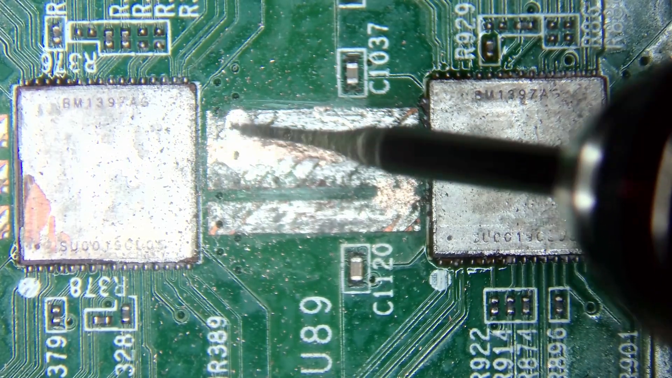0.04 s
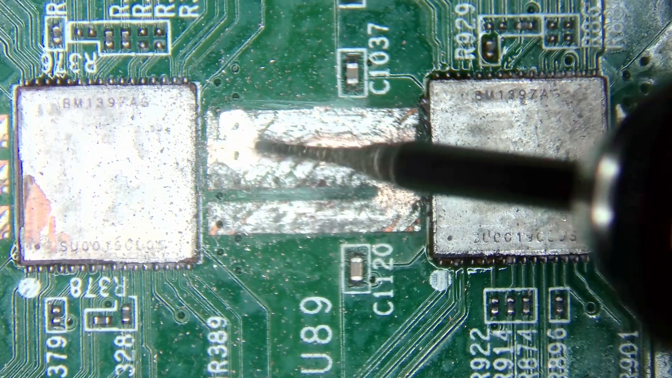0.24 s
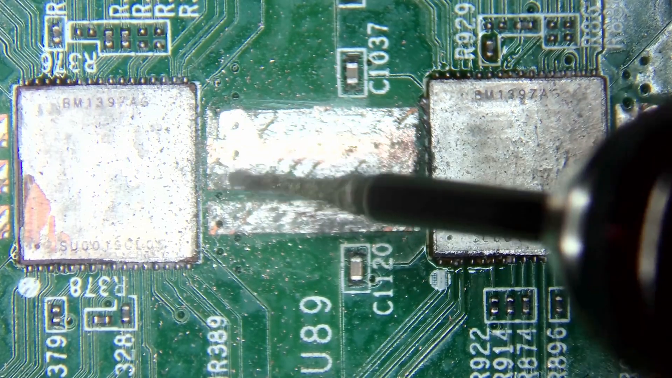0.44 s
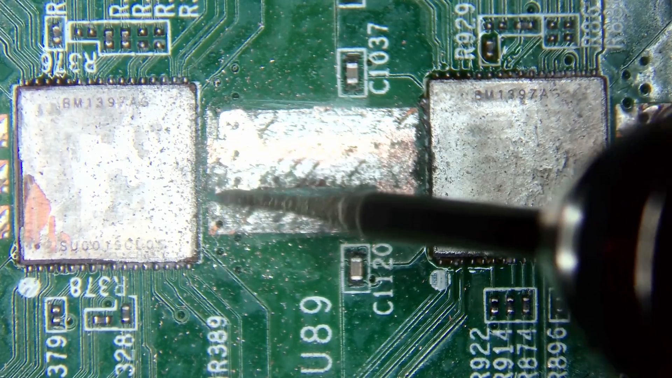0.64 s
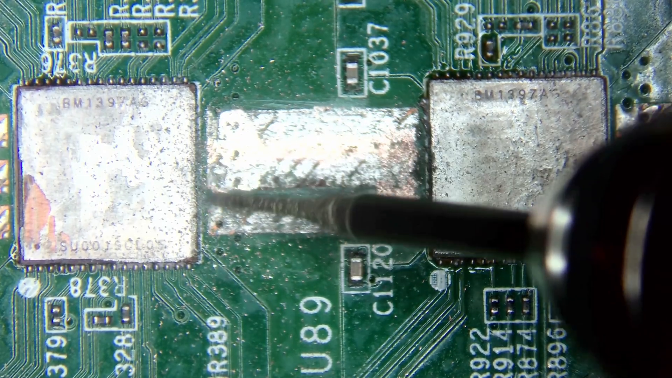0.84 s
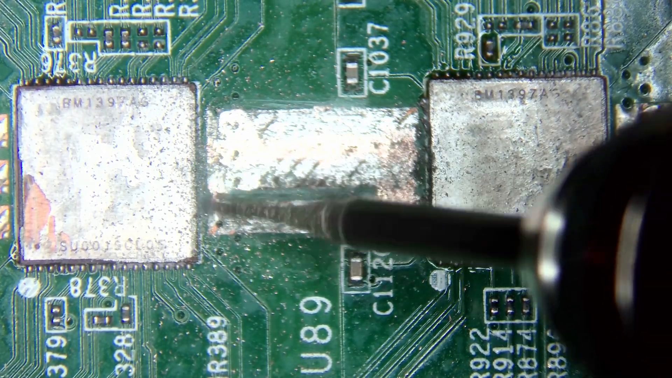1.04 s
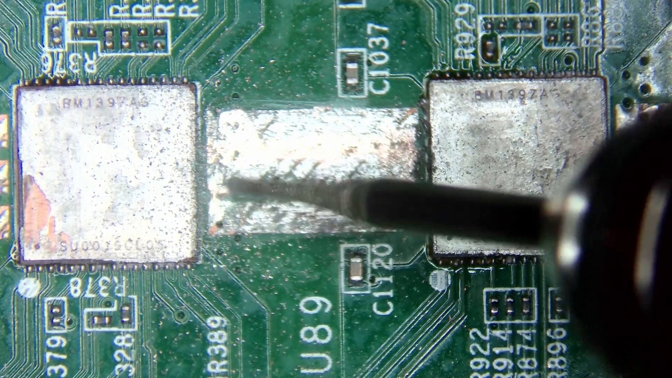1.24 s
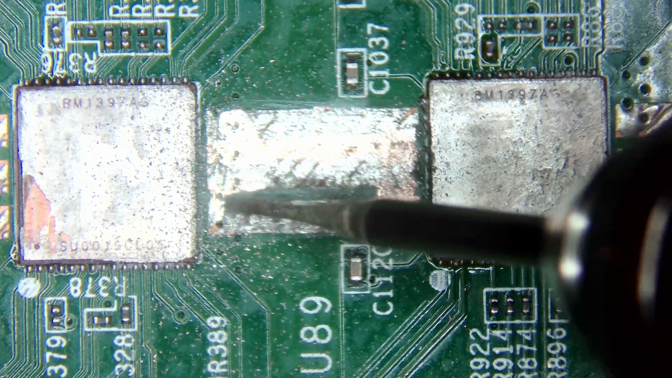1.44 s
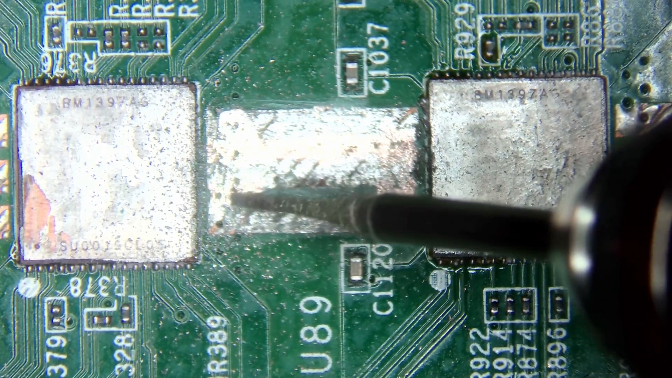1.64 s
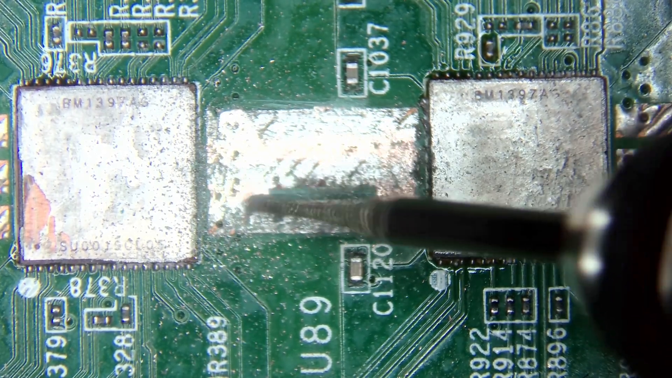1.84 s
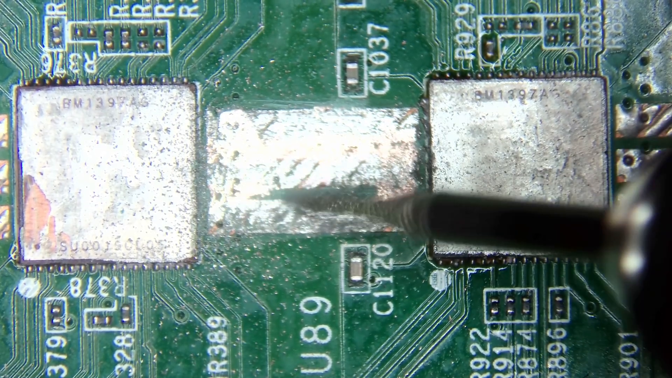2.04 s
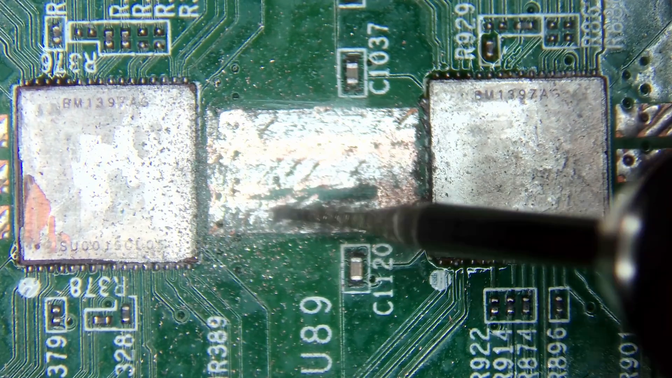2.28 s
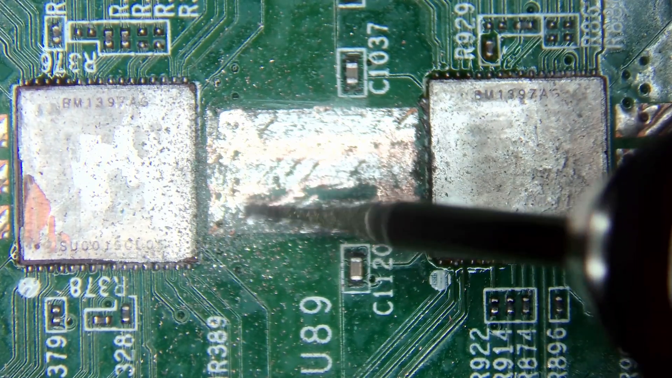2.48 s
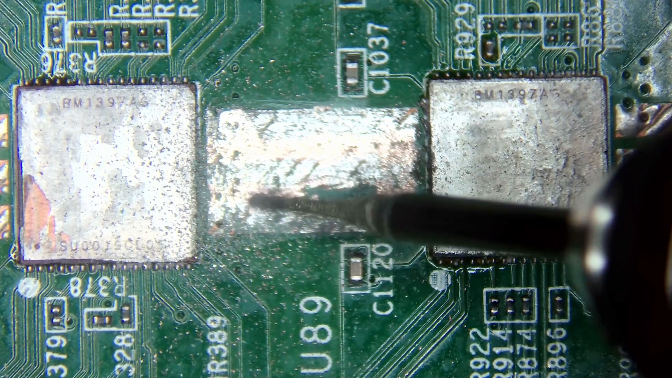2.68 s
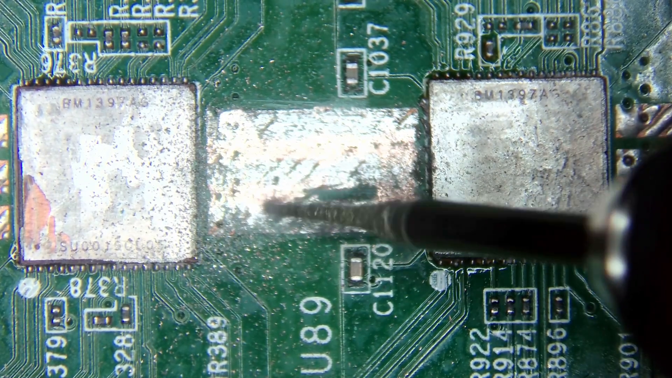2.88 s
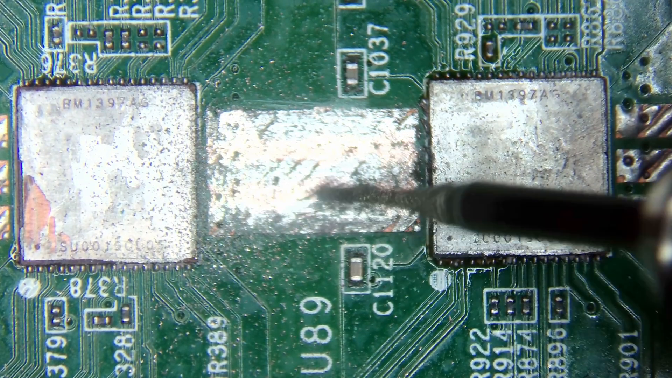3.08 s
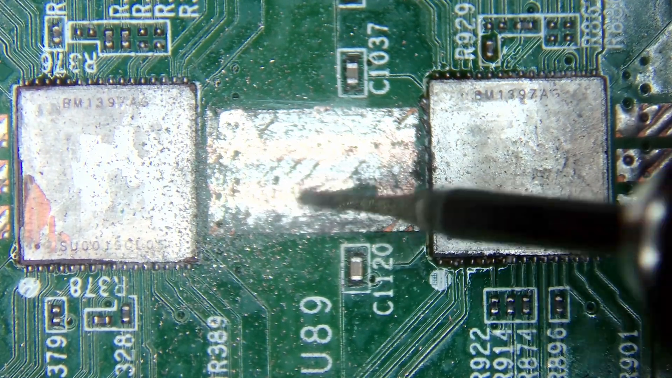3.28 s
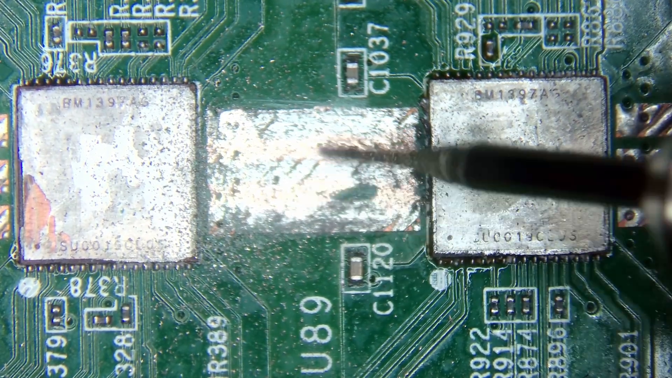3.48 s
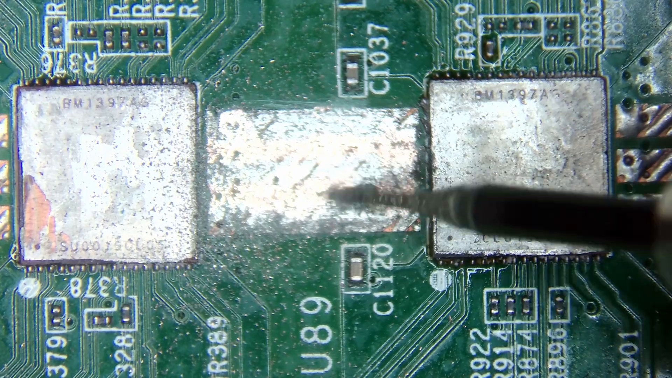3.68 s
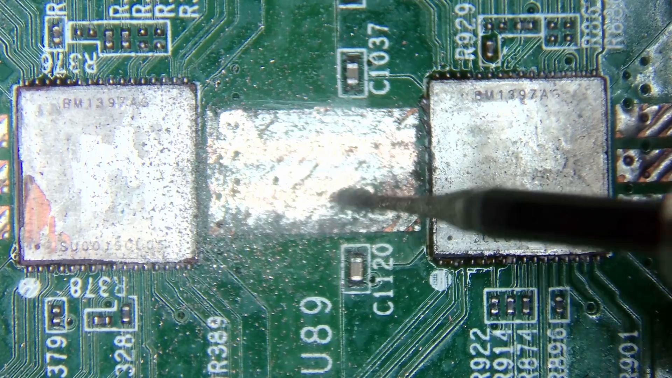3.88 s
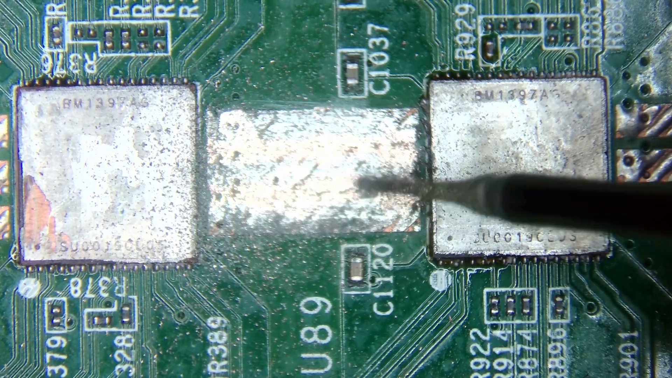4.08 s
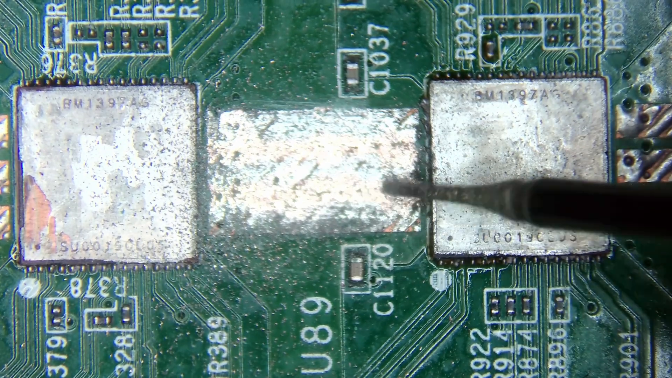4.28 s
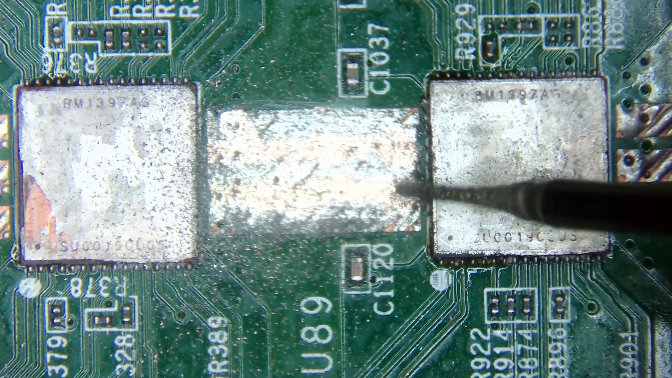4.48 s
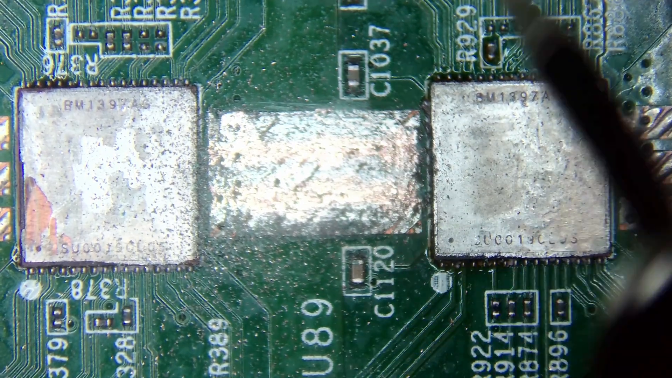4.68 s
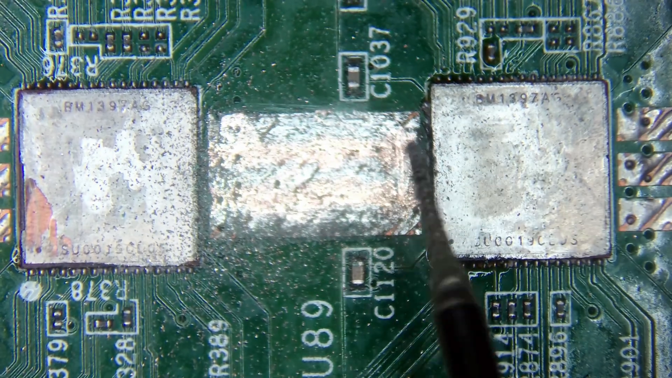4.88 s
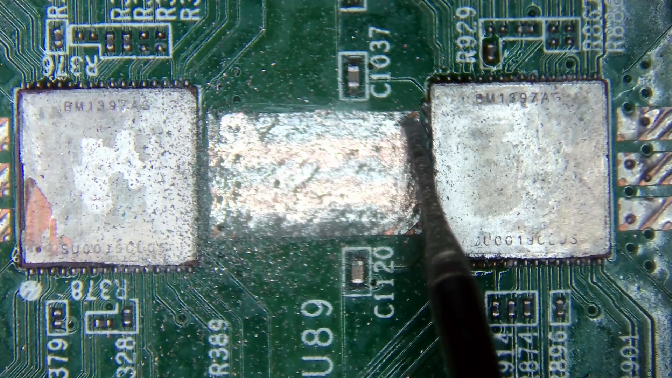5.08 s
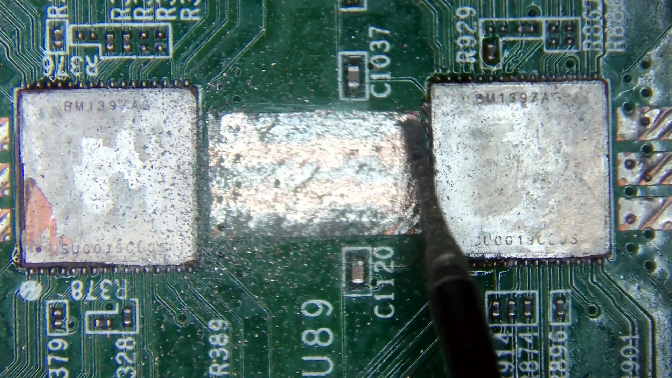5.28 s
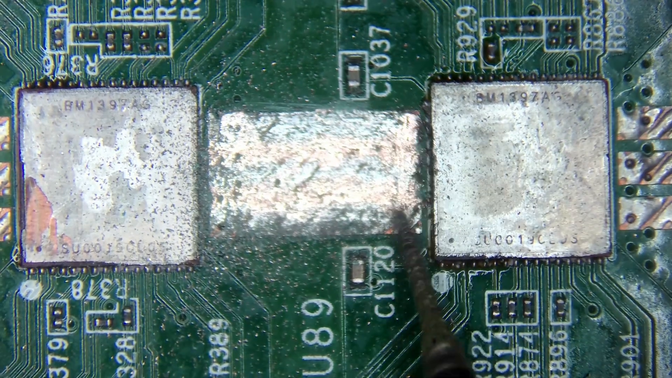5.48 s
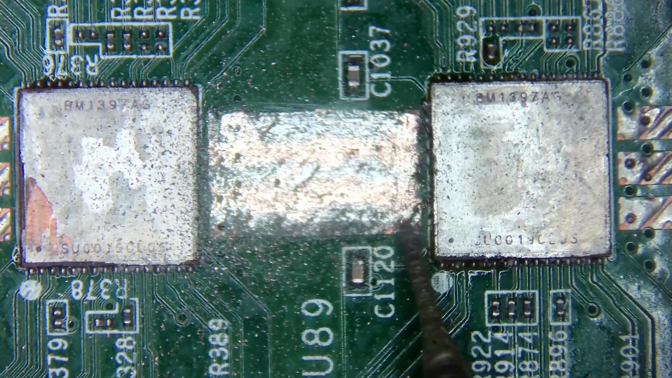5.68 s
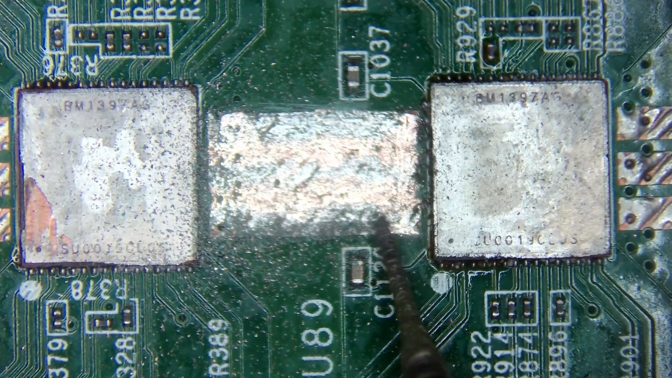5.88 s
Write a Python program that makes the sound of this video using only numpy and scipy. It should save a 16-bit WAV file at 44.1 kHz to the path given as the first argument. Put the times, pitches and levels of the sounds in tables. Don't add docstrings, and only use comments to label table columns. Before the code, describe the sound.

A pen-sized rotary grinder works on a circuit board very close to a small microphone. A rough, nasal buzz with hissing grit flutters rapidly as the burr skids and grips, almost unbroken for over four and a half seconds. It lifts, leaving a quieter thin motor whine for about half a second, then cuts again in shorter, brighter spurts. Low workshop rumble sits faintly underneath; the sound is dry.

```python
import sys
import numpy as np
from scipy import signal
from scipy.fft import rfft, irfft
from scipy.io import wavfile
from scipy.ndimage import uniform_filter1d

SR = 44100
rng = np.random.default_rng(int(sys.argv[2]) if len(sys.argv) > 2 else 0)


def int16_out(signal):
    q = np.round(np.clip(np.atleast_2d(signal).T, -1, 1) * 32767)
    wavfile.write(sys.argv[1], SR, q.astype(np.int16))


def nominal_scale(level):
    x = np.asarray(level, float) / 20
    return 10 ** x


N = 261513
T = np.arange(N) / SR
FREE_HZ = 219.6
SWING_S = 4.79


def level(x, db):
    return x * nominal_scale(db) / np.sqrt(np.mean(x ** 2))


def curve(rows):
    s, *columns = np.transpose(rows)
    return [np.interp(T, s, c) for c in columns]


def during(rows):
    return sum(value * ((T >= start) & (T < end)) for start, end, value in rows)


def bumps(rows, skew=0.):
    out = np.zeros(N)
    for s, height, half_ms in rows:
        near = slice(max(int((s - .15) * SR), 0), int((s + .15) * SR))
        x = 1000 * (T[near] - s) / half_ms - skew
        side = np.where(x < 0, 1 + skew, 1 - skew)
        out[near] += height * np.exp(-(x / side) ** 2)
    return out


def walk(rate):
    k = int(SR / rate)
    held = np.repeat(rng.standard_normal(N // k + 1), k)
    return uniform_filter1d(held, k)[:N]


def lag(x, tau_s):
    keep = np.exp(-1 / (tau_s * SR))
    return signal.lfilter([1 - keep], [1, -keep], x)


def clicks(at, size):
    at = np.clip(at, 0, N - 2)
    i = at.astype(int)
    return np.bincount(i, size * (1 - at + i), N) + np.bincount(i + 1, size * (at - i), N)


def colour(x, points, sudden=0.97, size=4096):
    hz, db = np.transpose(points)
    f = np.maximum(np.fft.rfftfreq(size, 1 / SR), 1)
    log_gain = np.interp(np.log(f), np.log(hz), db) * np.log(10) / 20
    cep = irfft(log_gain)
    cep[1:size // 2] *= 2
    cep[size // 2 + 1:] = 0
    phase = sudden * rfft(cep).imag
    response = np.roll(irfft(np.exp(log_gain + 1j * phase)), size // 2)
    return level(signal.fftconvolve(x, response)[size // 2:size // 2 + N], 0)


def shop():
    # f/Hz, level/dB [per Hz]
    rumble = [(12, -74), (20, -4.5), (117, -3), (270, -7.5), (306, -12.5), (409, -8.5), (447, -12.5),
              (597, -12), (702, -13), (1500, -12.5), (1950, -108), (3300, -120)]
    return level(nominal_scale(1.3 * walk(2.28)) * colour(rng.standard_normal(N), rumble), -55)


def bench(x, t60_s=.08):
    t = T[:int(.2 * SR)]
    echoes = rng.standard_normal(len(t)) * np.exp(-np.log(1000) * t / t60_s)
    return signal.fftconvolve(x, echoes)[:N]


def shaft():
    # touch t/s, lift t/s
    contacts = [
        (0, .257),
        (.283, 1.92),
        (1.947, 4.601),
        (5.07, 5.381),
        (5.533, 5.596),
        (5.612, 5.94),
    ]
    contact_grit = [-41, -41, -41.5, -43.5, -45, -44.5]
    # t/s, level/dB
    press = [(0, -39.5), (.26, -48.5), (.3, -43), (.6, -40), (.95, -46), (1.3, -41.5), (1.65, -39.5),
             (1.93, -41.5), (2.4, -42), (2.9, -40.5), (3.3, -39), (3.8, -40.5), (4.6, -40), (5.07, -43),
             (5.38, -45), (5.58, -55), (5.7, -44), (5.93, -41.5)]
    # t/s, f/Hz
    speed_first = [(0, 202), (.17, 200), (.24, 212), (.38, 194), (.44, 199), (.62, 195), (1.0, 205),
                   (1.28, 197), (1.9, 196)]
    # t/s, f/Hz
    speed_second = [(1.96, 199), (2.33, 201.7), (2.8, 200), (3.13, 193.4), (3.53, 189.4), (3.68, 196.5),
                    (3.79, 191.7), (4.0, 193), (4.3, 202.9), (4.6, 194.1)]
    # t/s, f/Hz
    speed_across = [(5.07, 215.8), (5.18, 202.1), (5.38, 201.9), (5.54, 215.7), (5.66, 214.6), (5.8, 197.1),
                    (5.93, 199.8)]
    # t/s, loss/dB, half length/ms
    skids = [(0.04, 3.0, 11), (0.07, 5.5, 12.8), (0.114, 6.5, 10), (0.145, 6.5, 5.9),
             (0.209, 7, 10.8), (0.332, 7, 5.2), (0.399, 7.1, 9.3), (0.453, 9.5, 20.2),
             (0.531, 8, 19.7), (0.582, 5.5, 11), (0.605, 10.5, 6.7), (0.677, 10.0, 24.3),
             (0.741, 9.5, 15.4), (0.811, 5.5, 33.4), (0.893, 5.0, 13), (0.98, 5, 14.4),
             (1.043, 7.5, 18.5), (1.119, 9.0, 19), (1.18, 9, 15.3), (1.268, 10, 10), (1.328, 8, 12),
             (1.394, 7.5, 11), (1.455, 10.5, 20.8), (1.516, 5, 13), (1.586, 5.5, 18.4),
             (1.654, 7, 22), (1.703, 10, 20.8), (1.775, 6.5, 17.3), (1.818, 4.0, 6.2),
             (1.863, 7.5, 15.6),
             (1.983, 6.5, 39.6), (2.059, 8.5, 14), (2.142, 6, 14), (2.209, 6.5, 4.8), (2.47, 6, 9),
                    (2.534, 5.5, 24.8), (2.604, 6.5, 12.5), (2.672, 4.5, 25), (2.786, 4, 23.7),
                    (2.816, 7.5, 9), (2.88, 7.5, 17.8), (3.019, 10.5, 7), (3.059, 4.5, 11.1),
                    (3.21, 2.5, 30), (3.285, 2, 12.7), (3.389, 2, 25), (3.424, 6.5, 8.1),
                    (3.565, 3.5, 14.43), (3.682, 9.5, 8.5), (3.739, 8, 11.6), (3.86, 4.5, 5.91),
                    (3.886, 4.5, 9.8), (4.048, 3, 10), (4.108, 3, 12.5), (4.168, 6, 9.9), (4.236, 7, 10.8),
                    (4.291, 3, 28.5), (4.405, 7.5, 7.9), (4.445, 7, 22), (4.525, 10.5, 17.9),
             (4.583, 9.5, 13), (5.078, 3.5, 12.1), (5.133, 6.5, 10.6), (5.197, 6, 26),
                    (5.253, 4.5, 14), (5.312, 3.5, 7.86), (5.34, 10, 7.1), (5.628, 7.5, 23),
                    (5.672, 10, 16), (5.738, 6, 15.3), (5.775, 8, 15.2), (5.844, 3.5, 12.2),
                    (5.873, 10, 13.55), (5.932, 3, 11)]
    # t/s, extra grit level/dB
    edges = [(0.293, 3), (1.128, -4), (1.424, 6), (2.5, 2.5), (3.76, -3), (4.43, 5.5), (5.101, 5.5),
             (5.28, 1.5), (5.712, 5.5), (5.812, 7), (5.91, 9)]
    inertia_s, edge_ms, regrip_ms = .028, 6.6, 2

    grit_db = during([(*contact, db) for contact, db in zip(contacts, contact_grit)])
    cutting = 1. * (grit_db < 0)
    touch, grit_gain = uniform_filter1d([cutting, cutting * nominal_scale(grit_db)], int(0.0091 * SR), mode="nearest")
    skid_db = bumps(skids, skew=0.44)

    drag_hz = FREE_HZ - curve(speed_first + speed_second + speed_across)[0]
    lost_drag = lag(1 - nominal_scale(-1.1 * skid_db), inertia_s)
    tremor_hz = 1.6 * walk(28)
    loaded_hz = FREE_HZ - drag_hz * (1 - lost_drag) + tremor_hz
    free = (1 - touch) * lag(1 - cutting, inertia_s)
    idle_hz = FREE_HZ + 2.2 * walk(9)
    speed_hz = loaded_hz + free * (idle_hz - loaded_hz)

    thinning_db = np.where(T < SWING_S, 0.063, 0.43) * skid_db
    regrip_db = -regrip_ms / 1000 * SR * np.gradient(skid_db)
    flare_db = bumps([(s, db, edge_ms) for s, db in edges]) + regrip_db
    grit_gain = grit_gain * nominal_scale(flare_db - thinning_db + 0.86 * walk(30))
    knock_gain = touch * nominal_scale(curve(press)[0] - 1.215 * skid_db + 1.54 * walk(40))
    return speed_hz, knock_gain, grit_gain


def motor(turns):
    brushes = [(0, 1.), (.143, .75), (.286, .3), (.429, 0), (.571, 0), (.714, .3), (.857, .75)]
    # f/Hz, level/dB [per Hz]
    motor_along = [(500, -55), (900, -9.5), (2000, -7), (2700, -6), (3600, -7.5), (4400, -1), (4900, -3.5),
                   (5600, -2.5), (6300, -5.5), (7500, -12.5), (10400, -14.5), (15600, -36.5)]
    # f/Hz, level/dB [per Hz]
    motor_across = [(530, -14), (900, -25), (1200, 3), (1350, -2.5), (1570, 2), (1900, -1.5), (3000, -7),
                    (4000, -5), (5350, -1), (6500, -4.5), (6900, -13), (8150, -10), (9300, -11.5),
                    (10600, -16.5), (15600, -30)]
    # t/s, level/dB
    loudness = [(0, -58.5), (4.62, -54), (5.05, -54.5), (5.45, -53.5), (5.93, -51.5)]

    k = np.arange(int(turns[-1]))[:, None]
    place, size = np.transpose(brushes)
    at = np.interp(k + place, turns, np.arange(N))
    wear = nominal_scale(3 * rng.standard_normal((N // 100, len(place)))[:len(k)])
    ticks = level(clicks(at.ravel(), (size * wear).ravel()), 0)
    hiss = nominal_scale(2.7 * walk(300)) * rng.standard_normal(N)
    whine = .45 * nominal_scale(2.5 * walk(10)) * ticks + hiss
    before, after = colour(whine, motor_along), colour(whine, motor_across)
    swing = np.clip((T - SWING_S) / 0.035 + .5, 0, 1)
    return nominal_scale(curve(loudness)[0]) * ((1 - swing) * before + swing * after)


def shank(turns, gain):
    # f/Hz, level/dB
    stem = [(1200, -40), (1600, -9), (1880, -1), (2050, -3), (2250, 0), (2550, -7), (3200, -40)]
    at = np.interp(np.arange(int(turns[-1])) + .8, turns, np.arange(N))
    same = np.ones(len(at))
    behind = 40 * (1 + .25 * walk(6)[at.astype(int)])
    even = clicks(at, same) + .6 * clicks(at + behind, same)
    return nominal_scale(-12 + 2.5 * walk(12)) * np.sqrt(gain * gain.mean()) * colour(even, stem)


def knocks(turns):
    # from t/s, to t/s, strong minus weak level/dB
    hop = [(.045, .32, 5.5), (.48, 1.2, 4.5), (1.25, 1.31, 5), (2.44, 2.525, 10), (2.555, 2.66, 10),
           (2.66, 2.89, 9.5)]
    # t/s, share of the blow before [ratio]
    flute = [(0, 0.47), (.6, 0.64), (2.2, 0.41), (2.5, .25), (2.85, 0.28), (3, .65), (4.2, 0.47),
             (4.6, 0.4), (5.07, 0.16)]

    k = np.arange(int(turns[-1]))
    at = np.interp(k + .5, turns, np.arange(N))
    i = at.astype(int)
    chance = rng.standard_normal((N // 100, 3))[k].T
    hop_db = during(hop)[i]
    scatter_db = np.where(hop_db > 0, 1.7, 1.5)
    scatter_turn = np.where(hop_db > 0, .022, .012)
    size = nominal_scale(scatter_db * chance[0] + hop_db * (k % 2 - 1.5))
    size = size / np.sqrt(uniform_filter1d(size ** 2, size=6))
    at = at + scatter_turn * chance[1] * SR / FREE_HZ

    share = curve(flute)[0][i] + .25 * walk(20)[i] + .15 * chance[2]
    share = np.clip(share, 0, 1.2)
    lag_ms = np.where(T < SWING_S, 0.85, 0.74)[i]
    behind = lag_ms / 1000 * (1 + .08 * walk(16)[i]) * SR
    size = size / (1 + .7 * share + .6 * share ** 2)
    times = np.r_[at, at + behind, at + 2 * behind]
    return clicks(times, np.r_[size, size * share, size * .65 * share ** 2])


def board(blows, gain):
    # f/Hz, level/dB
    ring_along = [(350, -28.5), (610, -3.5), (810, 7.5), (1000, 12), (1220, 16), (1460, 12.5), (1620, -1),
                  (1870, -13), (2220, 0.5), (2500, -39), (3200, -42)]
    # f/Hz, level/dB
    ring_across = [(350, -46), (610, -21), (820, -9), (1030, -1.5), (1230, -10), (1450, .5), (1650, -5),
                   (1850, -7), (2100, -12), (2500, -21), (3200, -42)]
    push = level(blows, 0) + .2 * rng.standard_normal(N)
    along, across = colour(push, ring_along, sudden=.65), colour(push, ring_across, sudden=.65)
    return nominal_scale(5.0) * gain * np.where(T < SWING_S, along, across)


def grit(blows, turns, gain):
    # f/Hz, level/dB [per Hz]
    grit_along = [(1000, -23), (1600, -7), (1900, -3), (2400, -7), (3220, -10.5), (4370, -3), (4920, -7.5),
                  (5640, 0), (6210, -6.5), (6730, -4), (8620, -16), (9720, -15.5), (11000, -25),
                  (15600, -38)]
    # f/Hz, level/dB [per Hz]
    grit_across = [(1350, -17.5), (2300, -4), (2700, -10.5), (3170, -4.5), (3660, -1), (4030, -5.5),
                   (5380, -0.5), (6520, -5), (7350, -11), (8150, -10), (10100, -21.5), (14300, -32),
                   (15600, -44)]
    depth = nominal_scale(0.61 * rng.standard_normal(N // 100))[turns.astype(int)]
    bite = depth * np.exp(1.93 * (np.cos(2 * np.pi * (turns - .5)) - 1)) + 0.54
    chips = rng.standard_normal(N) * nominal_scale(2.0 * rng.exponential(size=N)) * nominal_scale(1.2 * walk(500))
    tear = level(bite * chips, 0) + 0.15 * level(blows, 0)
    along, across = colour(tear, grit_along), colour(tear, grit_across)
    return nominal_scale(0.76) * gain * np.where(T < SWING_S, along, across)


def scene():
    hz, knock_gain, grit_gain = shaft()
    turns = np.cumsum(hz) / SR
    blows = knocks(turns)
    cut = board(blows, knock_gain) + grit(blows, turns, grit_gain)
    tool = cut + motor(turns) + shank(turns, knock_gain)
    return (tool + nominal_scale(-42) * bench(tool) + shop())[None]


def top_cut(x):
    return signal.sosfilt(signal.butter(12, 15750, fs=SR, output="sos"), x)


def record(dry):
    return top_cut(dry)


dry = scene()
out = record(dry)
int16_out(out)
```